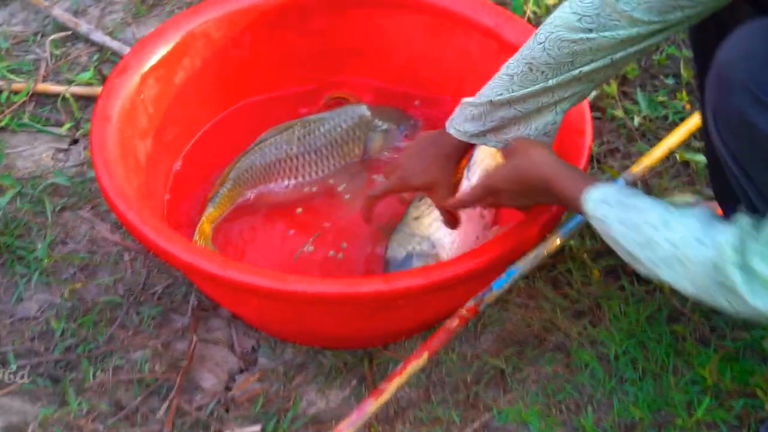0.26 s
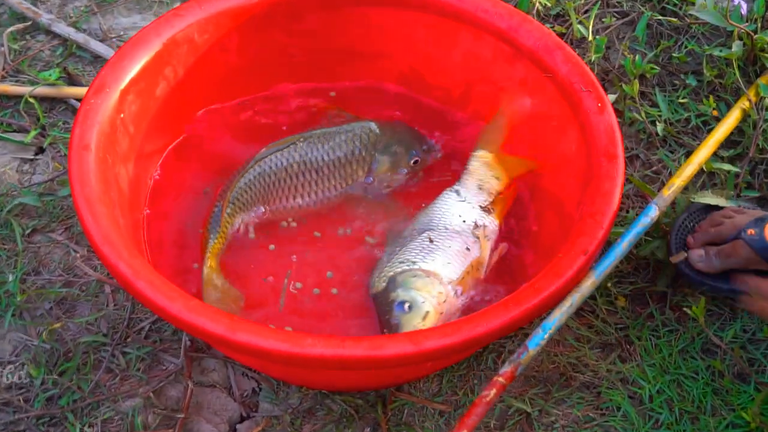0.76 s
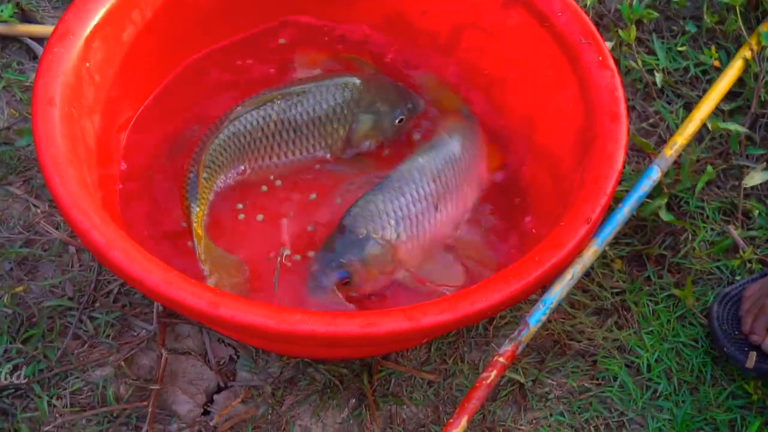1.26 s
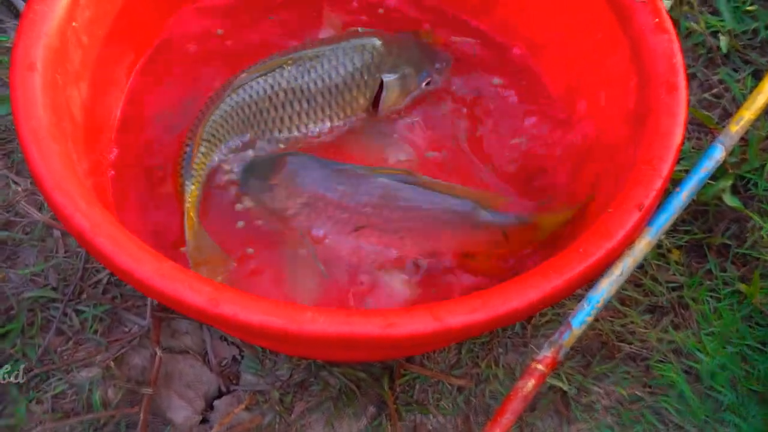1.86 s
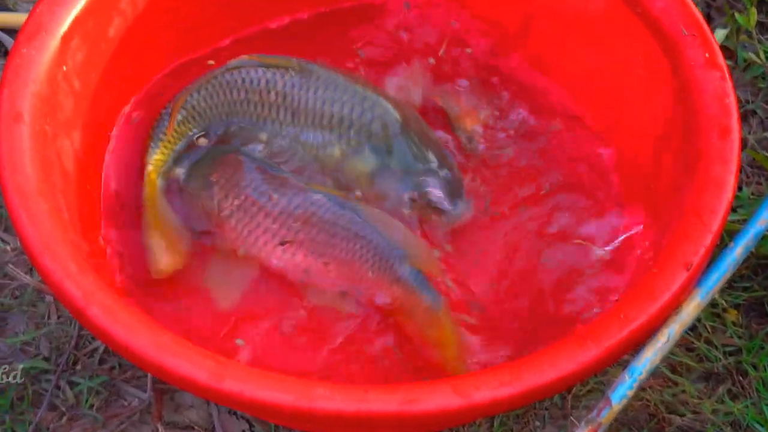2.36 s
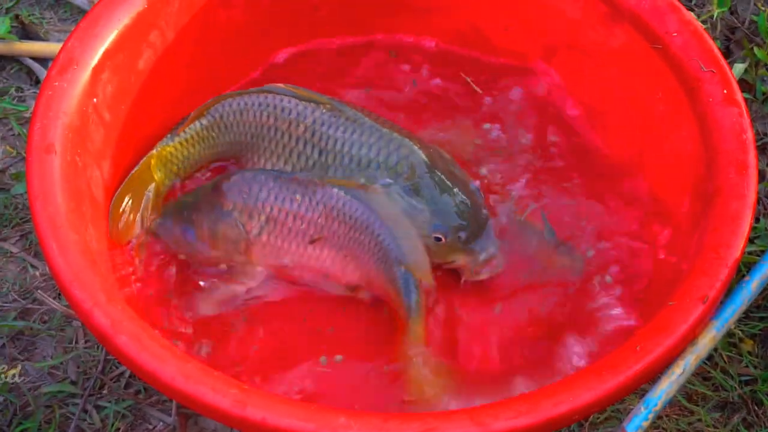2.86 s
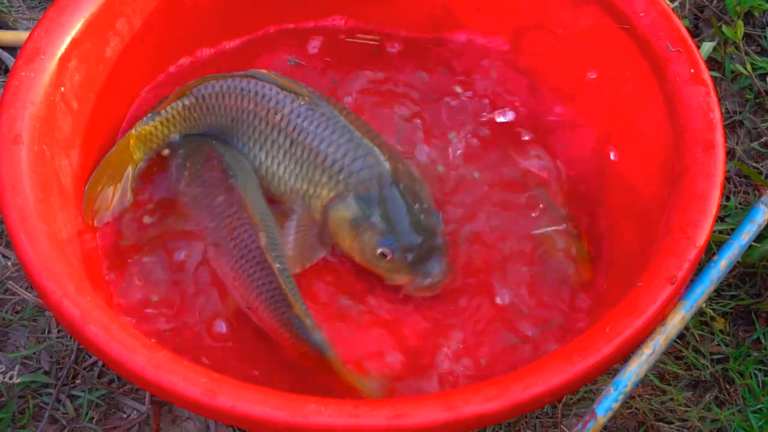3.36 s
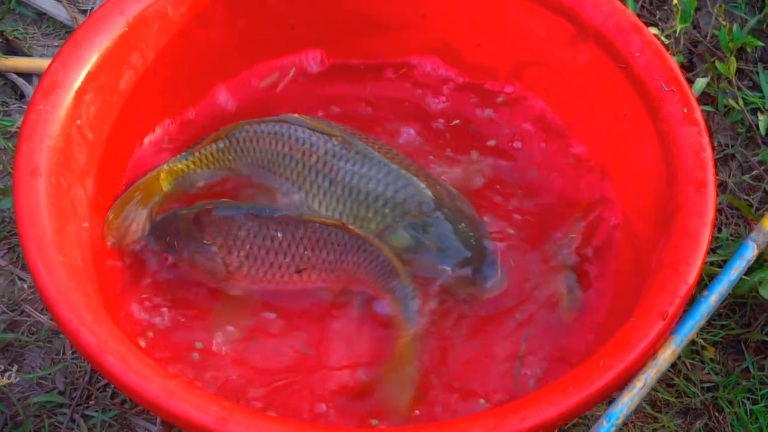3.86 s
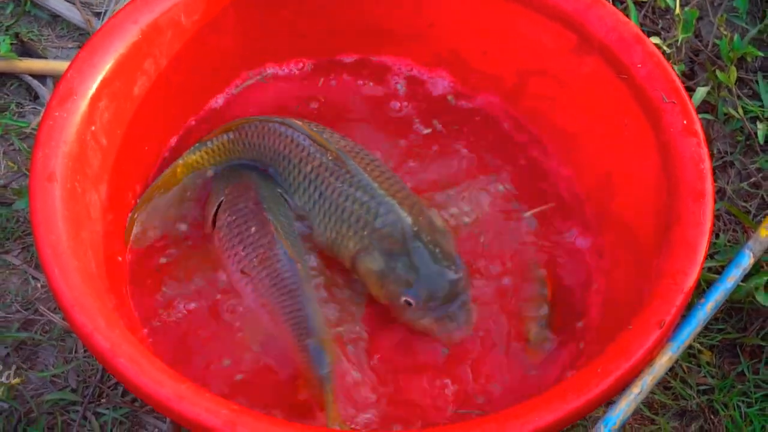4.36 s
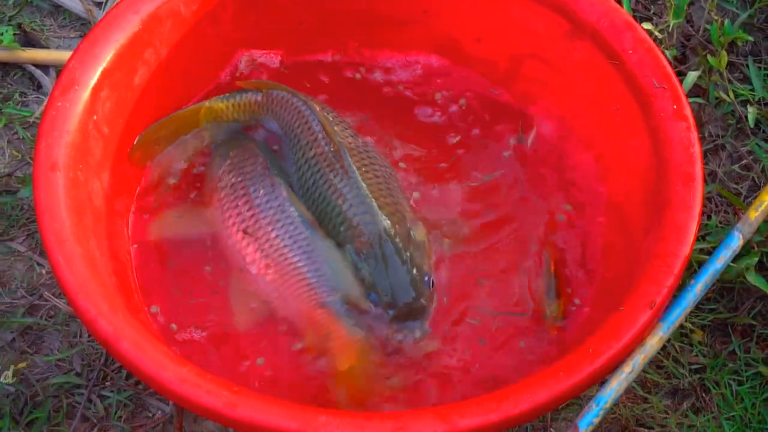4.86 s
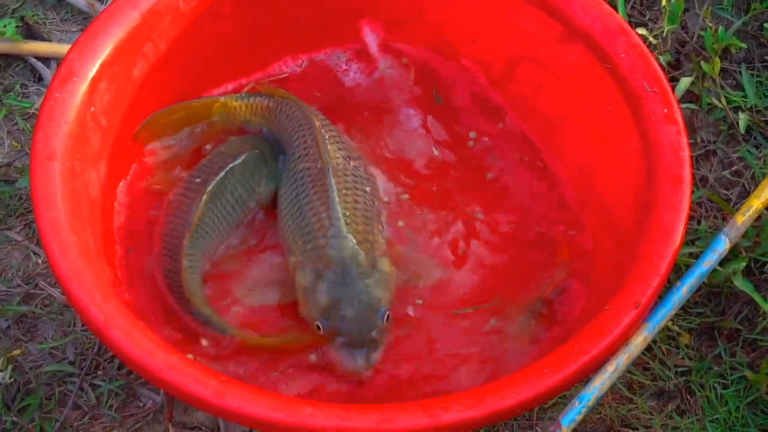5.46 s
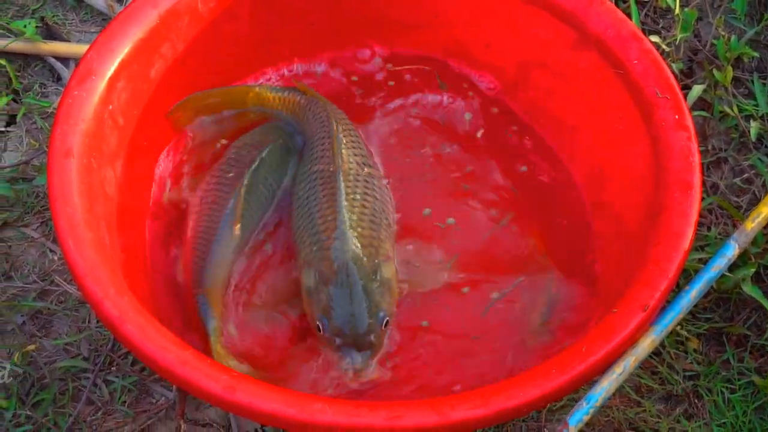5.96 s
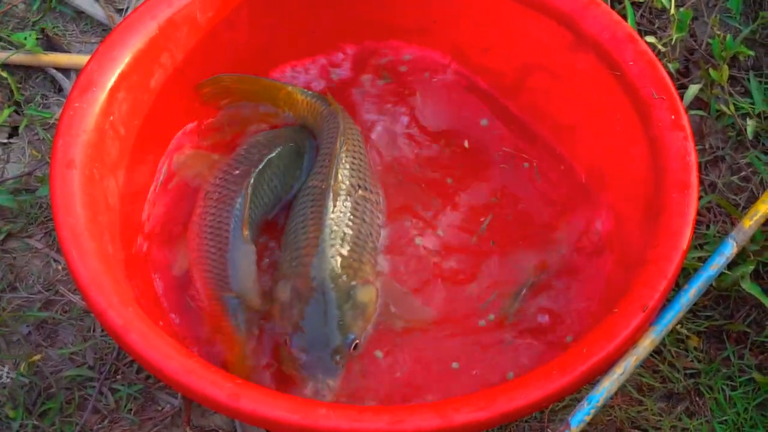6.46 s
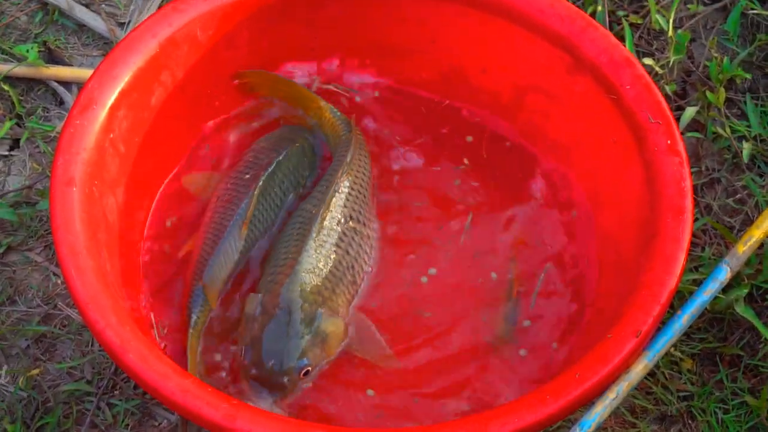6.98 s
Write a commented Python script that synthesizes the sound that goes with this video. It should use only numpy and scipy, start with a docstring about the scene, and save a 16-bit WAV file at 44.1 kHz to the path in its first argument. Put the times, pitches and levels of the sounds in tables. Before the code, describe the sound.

Close stereo sound of fish in a water-filled plastic basin outdoors. Soft swishing leads to a sharp volley of wet slaps and dull bumps on the tub, a short lull, then a second bout full of rising bubble plops and bright droplet ticks. Later the water only stirs now and then, and a bird's repeated chirps echo lightly from trees. Soft hiss trails the sounds, and a small splash ends it.

```python
"""Carp thrashing in a tub

Two carp thrash in shallow water in a plastic tub, outdoors and close by: noise swells into swish and froth.
Tails slap as short volleys of pops, trapped bubbles ring as rising tones, drops tick as brief noise.
Narrow grainy bands of noise swell, glide and fade; bodies thud on the tub's modes; a low rumble lies far off.
Towards the end birds whistle in gliding harmonics, smeared by echoes from the trees: a far whistle,
a faint rise, a sharp chip, two falling slurs, then a run of chirps. Hiss trails the sounds."""
import sys
import numpy as np
from scipy import signal
from scipy.fft import rfft, irfft, next_fast_len
from scipy.io import wavfile
from scipy.ndimage import uniform_filter1d, map_coordinates

SR = 44100
rng = np.random.default_rng(int(sys.argv[2]) if len(sys.argv) > 2 else 0)


def file_out(sig):
    """Save sig as 16-bit WAV at sys.argv[1]."""
    # one column per channel
    cols = np.atleast_2d(sig).T
    # limit, then scale
    lim = np.clip(cols, -1, 1)
    pcm = np.round(lim * 32767).astype(np.int16)
    wavfile.write(sys.argv[1], SR, pcm)


N = 318402
TIME = np.arange(N) / SR


def from_db(db):
    """Turn decibels into an amplitude factor."""
    return 10 ** (np.asarray(db) / 20)


def rms_one(x):
    """Scale a sound to an rms of 1."""
    return x / np.sqrt(np.mean(x ** 2) + 1e-20)


def at_hz(points, hz):
    """Read a spectrum in dB on a log-frequency axis."""
    point_hz, db = np.transpose(points)
    return np.interp(np.log(hz), np.log(point_hz), db)


def band(x, low_hz, high_hz):
    """Causal band-pass."""
    edges_hz = [low_hz, min(high_hz, .45 * SR)]
    sos = signal.butter(2, edges_hz, "band", fs=SR, output="sos")
    return signal.sosfilt(sos, x + 1e-18)


def add(out, start_s, sound):
    """Mix a sound in at its start time."""
    at = max(0, round(start_s * SR))
    out[..., at:at + sound.shape[-1]] += sound[..., :max(0, N - at)]


def panned(sound, pan_db):
    """Place a sound between the ears; positive is left."""
    return sound * from_db(np.outer([.5, -.5], pan_db))


def drift(rate_hz):
    """Smooth random wander through normal knots, rate_hz of them a second."""
    knots = rng.standard_normal(2000)
    wander = map_coordinates(knots, [TIME[::20] * rate_hz], order=2, mode="wrap")
    return wander.repeat(20)[:N]


def ring(clicks, hz, cycles):
    """Resonance that dies by 60 dB in so many cycles."""
    r = from_db(-60 * hz / (cycles * SR))
    return signal.lfilter([1, 0, -1], [1, -2 * r * np.cos(2 * np.pi * hz / SR), r * r], clicks + 1e-18)


def noise(spectrum, low_hz, high_hz, side_db):
    """Smooth stereo noise of a given colour, scaled to rms 1."""
    size = next_fast_len(N)
    colour = from_db(at_hz(spectrum, np.fft.rfftfreq(size, 1 / SR) + 1))
    mid, side = irfft(rfft(rng.standard_normal((2, size))) * colour, size)[:, :N]
    stereo = mid + from_db(side_db) * side * [[1], [-1]]
    return rms_one(band(stereo, low_hz, high_hz))


def echoes(x, delay_s, t60_s, low_hz, high_hz):
    """Scattered reflections that build up and die away, different at each ear; about unit gain in band."""
    t = TIME[:SR * 3 // 4]
    paths = band(rng.standard_normal((2, len(t))), low_hz, high_hz)
    paths = paths * np.tanh(t / delay_s) ** 2 * from_db(-60 * t / t60_s)
    paths = rms_one(paths) * np.sqrt((high_hz - low_hz) / (SR / 2) / len(t))
    return signal.fftconvolve(x, paths, axes=1)[:, :N]


def swarm(low_hz, high_hz, per_s, spread_db, cycles, scatter_db, count=11):
    """Bubbles of many sizes pop at random places; a resonance applied twice rounds their attack."""
    out, edges = np.zeros((2, N)), np.geomspace(low_hz, high_hz, count + 1)
    for lower, upper in zip(edges, edges[1:]):
        hz = np.sqrt(lower * upper)
        when, size, sign, place = rng.random((24000, 4))[:int(per_s * N / SR)].T
        # many small pops, a few large ones
        height = np.sign(sign - .5) * from_db(spread_db * np.minimum(-np.log(size + 1e-9), 3))
        clicks = np.zeros((2, N))
        clicks[:, (when * N).astype(int)] = panned(height, scatter_db * (2 * place - 1))
        pops = rms_one(ring(ring(clicks, hz, cycles), hz, cycles))
        out += np.sqrt(upper - lower) * from_db(at_hz(WATER, hz)) * pops
    return rms_one(out)


SLAP_FIZZ_DB, FIZZ_LOSS_PER_SLOSH = 0, 8.2  # fizz over bubbling; dB of it lost when slosh equals bubbling


def slap_levels(level_db, depth_db):
    """Slosh, bubbling and fizz of a slap in dB: the deeper it goes, the less spray it throws."""
    fizz_db = SLAP_FIZZ_DB - FIZZ_LOSS_PER_SLOSH * from_db(depth_db)
    return level_db + np.array([depth_db, 0, fizz_db])


# restlessness of the water between strokes: start_s, level_db (of its bubbling)
UNREST = [(0, -54.5), (.4, -56), (.55, -53), (.68, -53.5), (.95, -53.5), (1.1, -45.5), (1.55, -59),
          (1.85, -49.5), (2.27, -53), (2.45, -83.5), (2.8, -67), (3.05, -75), (3.55, -104), (4.0, -70),
          (4.4, -77), (4.9, -69.5), (5.3, -71), (6.3, -80), (7.1, -64)]
UNREST_SLOSH_DB, UNREST_FIZZ_DB = -6.5, -4  # against its bubbling
# a body or tail sweeps through the water:
# start_s, length_s, bubbling_db, slosh_over_bubbling_db, fizz_over_bubbling_db
SWEEPS = [(0.134, 0.029, -52.5, -7, 7.5), (0.19, 0.12, -48.5, 0.5, -3.5), (0.318, 0.048, -45, -7.5, -4),
          (0.437, 0.074, -55.5, -16, 10), (0.733, 0.09, -46, -6, -3), (1.3, 0.045, -38.5, -13, -9),
          (1.967, 0.048, -57.5, 13.5, -13), (2.084, 0.045, -63, 14, -10), (2.308, 0.024, -56, 11.5, 9),
          (2.586, 0.02, -46.5, -9, -9), (2.924, 0.04, -54.5, 14, 9.5), (3.006, 0.14, -47.5, -20, -6.5),
          (3.149, 0.1, -41.5, 0.5, 2.5), (3.255, 0.12, -44, -8, -9), (3.422, 0.14, -49.5, -15, -4.5),
          (3.6, 0.11, -56, -39, -1), (3.667, 0.09, -49, -38, 4.5), (3.795, 0.034, -53, -3, 2),
          (4.02, 0.034, -43.5, -12.5, -3), (4.068, 0.056, -44, -2.5, 2), (4.127, 0.11, -44, -15, -6),
          (4.332, 0.15, -49.5, -19, -5.5), (4.629, 0.057, -57.5, -16, 11), (4.736, 0.021, -51, -21, -12),
          (5, 0.1, -54.5, 0, 1.5), (5.335, 0.03, -73, -31, 11), (5.398, 0.069, -74, -47, 20.5),
          (5.535, 0.12, -60, -32, 0), (5.739, 0.01, -59, -10, 11), (5.824, 0.028, -47, -6.5, -7),
          (5.962, 0.088, -72, -15, 17), (6.193, 0.065, -44.5, -14, -6), (6.264, 0.053, -46.5, 2.5, -7),
          (6.316, 0.099, -47, -4.5, -6.5), (6.516, 0.13, -47.5, -43, -22), (6.739, 0.036, -52, -11, -16),
          (7.074, 0.022, -49, -0.5, -16)]
SWEEP_ATTACK_S, SETTLE_DB_PER_S = 0.027, 190
WAKE_DB = -10  # the water that a slap leaves churning, against the slap


def stirring():
    """Gains of slosh, bubbling and fizz: each stroke builds, holds and settles, on top of the general unrest."""
    t = TIME[::40]
    unrest_db = np.interp(t, *np.transpose(UNREST))
    power = from_db(np.add.outer([UNREST_SLOSH_DB, 0, UNREST_FIZZ_DB], unrest_db)) ** 2
    strokes = []
    for start_s, length_s, bubbling_db, slosh_db, fizz_db in SWEEPS:
        strokes.append((start_s, length_s, bubbling_db + np.array([slosh_db, 0, fizz_db])))
    for start_s, length_s, level_db, depth_db in SLAPS:
        strokes.append((start_s, length_s, slap_levels(level_db + WAKE_DB, depth_db)))
    for start_s, length_s, levels_db in strokes:
        attack = np.clip((t - start_s) / SWEEP_ATTACK_S, 0, 1)
        settle = from_db(-SETTLE_DB_PER_S * np.maximum(t - start_s - length_s, 0))
        power += np.outer(from_db(levels_db), attack * settle) ** 2
    return [np.interp(TIME, t, np.sqrt(p)) for p in power]


# how much the water froths: start_s, popping_over_swish_db (before random surges)
FROTH = [(0, -2.5), (1.9, 1), (2.8, 3), (3.35, 13.5), (4.3, 17.5), (4.8, 5.5), (6.3, 3), (7.0, -21),
         (7.2, 12)]
# colour of the churned water in the tub: frequency_hz, relative density (dB per Hz)
WATER = [(150, -35.5), (330, -13.5), (520, -16), (750, -6), (1100, -2), (1750, -3.5), (2250, 3),
         (3200, 0.5), (4800, -3.5), (7500, -2.5), (11000, -5), (15500, -10.5)]
# edges of the slosh, bubbling and fizz registers: frequency_hz
REGISTERS = [480, 1500, 4700, 16500]


def wash(slosh=(90, 3.6, 15), bubbling=(170, 5.0, 25), fizz=(150, 5.0, 15),
         surge_db=11.0, scatter_db=7, side_db=-4, level_db=-3.5):
    """Stirred water: a smooth swish that breaks into froth, in three registers."""
    froth = from_db(np.interp(TIME, *np.transpose(FROTH)) + surge_db * drift(70))
    out = np.zeros((2, N))
    registers = zip(REGISTERS, REGISTERS[1:], stirring(), (slosh, bubbling, fizz))
    # each register has its pops per second, size spread in dB and cycles of ring
    for low_hz, high_hz, gain, (per_s, spread_db, cycles) in registers:
        swish = noise(WATER, low_hz, high_hz, side_db)
        popping = froth * swarm(low_hz, high_hz, per_s, spread_db, cycles, scatter_db)
        water = (swish + popping) / np.hypot(1, froth)  # froth changes texture, not power
        out += water * gain * from_db(level_db)
    return out


# narrow grainy bands of noise, some trailing a pop: start_s, length_s, level_db, first_pitch_hz, last_pitch_hz
NARROW_BANDS = [(0, 0.23, -55.5, 1704, 1360), (0.39, 0.15, -58, 1020, 1005), (0.505, 0.17, -62, 2740, 2530),
                (0.717, 0.12, -52, 946, 1150), (2.923, 0.052, -57.5, 1120, 968),
                (3.023, 0.13, -51, 1100, 1287), (4.169, 0.12, -44, 2170, 2374),
                (4.271, 0.13, -48.5, 2630, 2310), (4.399, 0.076, -49.5, 2260, 1700),
                (6.274, 0.12, -58.5, 1042, 820)]


def narrow_bands(width_hz=480, grain_db=3.5):
    """Narrow grainy bands of noise that swell, glide and fade: slow noise multiplies a gliding sine."""
    out = np.zeros(N)
    slow_noise = band(rng.standard_normal(N), 10, width_hz / 2)
    slow_noise = rms_one(slow_noise * from_db(grain_db * drift(120)))
    for start_s, length_s, level_db, first_hz, last_hz in NARROW_BANDS:
        progress = np.linspace(0, 1, int(length_s * SR))
        pitch_hz = first_hz + (last_hz - first_hz) * progress
        tone = np.sin(2 * np.pi * np.cumsum(pitch_hz) / SR)
        swell = np.sqrt(np.abs(np.sin(np.pi * progress)))
        grain = np.roll(slow_noise, -round(start_s * SR))[:len(progress)]
        add(out, start_s, from_db(level_db) * rms_one(swell * tone * grain))
    return out


# distant outdoor rumble: frequency_hz, relative density (dB per Hz)
RUMBLE = [(25, -32.5), (55, -5), (120, 2), (155, -0.5), (200, -15.5), (350, -13.5), (700, -22), (2000, -47),
          (16000, -28.5)]


def rumble(level_db=-73):
    """Far, mostly low noise, nearly the same at both ears."""
    return from_db(level_db) * noise(RUMBLE, 25, 16000, side_db=-21)


# the larger air pockets: start_s, level_db (of the swell, before the layer level), pitch_hz (about which it glides)
BUBBLES = [(.213, -36, 1080), (0.24, -36.5, 1160), (0.5058, -24.5, 2515), (.582, -39.5, 996),
           (0.846, -44, 1050), (0.907, -43.5, 1020), (1.1947, -27, 2030), (1.267, -28, 1800),
           (1.323, -24, 2190), (1.392, -38.5, 988), (1.9173, -25.5, 1190), (2.018, -37, 1260),
           (2.036, -33.5, 730), (2.134, -34, 700), (2.149, -39, 814), (2.1796, -31.5, 4550),
           (2.276, -43.5, 935), (2.344, -32.5, 2300), (2.3709, -32.5, 4550), (2.473, -37.5, 1795),
           (2.5322, -34, 2980), (2.551, -28.5, 4150), (2.613, -38, 2670), (2.8137, -32.5, 2270),
           (2.847, -38, 2070), (2.8597, -37, 2370), (2.898, -38.5, 2050), (2.958, -27.5, 2610),
           (2.9658, -27.5, 1040), (3.046, -26.5, 2510), (3.0816, -31, 2590), (3.11, -26.5, 1110),
           (3.1325, -28, 1540), (3.173, -25, 980), (3.2039, -17.5, 2900), (3.22, -19, 2940),
           (3.283, -33, 1340), (3.294, -38, 1105), (3.376, -35, 3020), (3.2392, -27.5, 1500),
           (3.419, -32, 1470), (3.454, -33, 3880), (3.468, -32, 4120), (3.4958, -30, 2060),
           (3.6, -38.5, 1650), (3.63, -17.5, 3270), (3.715, -24.5, 970), (3.7702, -30, 1790),
           (3.846, -30, 4160), (3.9294, -32.5, 3450), (4.0624, -28.5, 2430), (4.086, -30, 1560),
           (4.095, -31.5, 1100), (4.156, -7, 2210), (4.1695, -24.5, 3300), (4.1205, -23, 2800),
           (4.1899, -32, 2090), (4.245, -30, 2560), (4.275, -24.5, 2660), (4.3248, -36.5, 2480),
           (4.3583, -20, 3780), (4.4046, -26, 2500), (4.431, -34, 2850), (4.4473, -32, 3600),
           (4.4764, -37.5, 1610), (4.486, -32, 1730), (4.542, -35, 1730), (4.5497, -29, 3720),
           (4.607, -32.5, 2200), (4.672, -43, 3800), (4.6826, -38, 2540), (5.8426, -28.5, 1670),
           (5.8643, -32.5, 1540), (6.0262, -33, 1240), (6.243, -28, 721), (6.248, -34, 1710),
           (6.253, -29, 852), (6.286, -37.5, 1190), (7.189, -25, 2150), (7.197, -25.5, 1314),
           (7.2125, -14.5, 2190)]
SWELL_CYCLES = 3.54  # the swell peaks after so many cycles, so large pockets ring longer


def bubbles(glide=0.011, swell=2.25, linger_db=-21, linger=13.0, tear_db=-13, tear_cycles=9,
            tear_width=1.286, scatter_db=1.0, layer_db=-.5):
    """An air pocket tears off with a short splutter, swells into a ring and climbs in pitch as it nears the surface."""
    out, t = np.zeros((2, N)), TIME[:3000]
    for start_s, level_db, hz in BUBBLES:
        age = t * hz / SWELL_CYCLES
        shape = (age * np.exp(1 - age)) ** swell
        shape += from_db(linger_db) * np.tanh(age) * np.exp(-age / linger)
        pitch_hz = hz * (1 + glide * rng.uniform(0.62, 1.8) * (np.minimum(age, 10) - 1))
        tone = shape * np.sin(2 * np.pi * np.cumsum(pitch_hz) / SR)
        splutter = rms_one(band(rng.standard_normal(len(t)), hz / tear_width, hz * tear_width))
        tone += from_db(tear_db) * splutter * np.exp(-t * hz / tear_cycles)
        pan_db = scatter_db * rng.uniform(-0.69, 1)
        add(out, start_s, panned(from_db(level_db + layer_db) * tone, pan_db))
    return out


# tail and fin slaps; deep ones slosh, shallow ones only crack:
# start_s, length_s, level_db, depth_db (slosh over bubbling)
SLAPS = [(0.24, 0.0067, -40, 3.5), (0.9745, 0.0093, -30.5, -54), (0.99, 0.0034, -35, -45),
         (1, 0.0012, -27, -18), (1.049, 0.013, -33.5, 0.5), (1.226, 0.0066, -33.5, -8.5),
         (1.238, 0.0036, -36.5, -1), (1.279, 0.0096, -38.5, -3.5), (1.331, 0.0044, -29, -13.5),
         (1.359, 0.0096, -31, -1.5), (1.438, 0.003, -33, -12), (1.456, 0.0087, -35.5, -1),
         (1.57, 0.012, -35.5, -7.5), (1.677, 0.006, -33, -4.5), (1.766, 0.011, -33.5, -7.5),
         (1.805, 0.0053, -38, -31), (1.827, 0.017, -35.5, -6), (1.909, 0.0058, -38, -7),
         (1.918, 0.011, -30, -6), (1.975, 0.0022, -34, -21), (1.986, 0.011, -37, -2),
         (2.037, 0.021, -46.5, 9.5), (2.062, 0.013, -36, -3), (2.143, 0.0061, -38.5, -3),
         (2.846, 0.012, -47.5, -65), (2.925, 0.0017, -35, -7.5), (2.96, 0.0029, -36, -20),
         (3.168, 0.019, -32, -1), (3.202, 0.006, -25, -11), (3.211, .012, -34, 6.5),
         (3.239, 0.0059, -37, -9), (3.416, 0.00033, -29, -35), (3.715, 0.0063, -30, -4),
         (4.117, 0.0082, -35.5, -31), (4.139, 0.0019, -34, -27), (4.171, 0.0044, -33.5, -34.5),
         (4.277, 0.0055, -40.5, -33), (4.543, 0.014, -44, -44), (6.025, 0.0076, -39, -21),
         (6.83, 0.0042, -54, 7.5), (7.087, 0.0031, -61, 19.5), (7.178, 0.039, -35.5, -15.5),
         (7.207, 0.018, -36.5, -6)]


def slaps(fall=1.6, rise_s=0.00023, crackle_db=2.0, sheet_db=-6, lead_in_db=-14, lead_in_s=0.0016):
    """A slap starts with a very brief, faint ramp of noise, then a sheet of water tears into collapsing pockets."""
    out, t = np.zeros((2, N)), TIME[:4096]
    before = TIME[512:0:-1]  # time left until the slap
    lead_in = from_db(lead_in_db) * np.exp(-before / lead_in_s)
    for register, (low_hz, high_hz) in enumerate(zip(REGISTERS, REGISTERS[1:])):
        pockets = swarm(low_hz, high_hz, per_s=390, spread_db=3.5, cycles=5.5, scatter_db=10.0, count=8)
        sheet = from_db(sheet_db) * noise(WATER, low_hz, high_hz, side_db=-5)
        churn = (pockets + sheet) * from_db(crackle_db * drift(700))
        for start_s, length_s, level_db, depth_db in SLAPS:
            burst = (1 - np.exp(-t / rise_s)) * np.exp(-(t / max(length_s, .002)) ** fall)
            shape = np.r_[lead_in, burst]
            places = round(start_s * SR) + np.arange(len(shape))
            volley = rms_one(shape * churn.take(places, axis=1, mode="wrap"))
            volley *= np.sqrt(length_s * SR / len(shape))  # longer slaps carry more energy
            gain = from_db(slap_levels(level_db, depth_db)[register])
            add(out, start_s - before[0], volley * gain)
    return out


# drops landing and films bursting: start_s, level_db (peak before the layer level), brightness_hz
DROPS = [(0.2661, -22, 4500), (0.4645, -28.5, 9500), (0.501, -18.5, 4380), (.977, -10.5, 6350),
         (1.104, -15.5, 7040), (1.1068, -19, 7400), (1.281, -19, 2390), (1.3305, -12, 2780),
         (1.387, -30, 6000), (1.9065, -24, 5300), (2.045, -24, 4760), (2.225, -16.5, 8900),
         (2.269, -20.5, 5700), (2.284, -28, 4800), (2.3145, -21, 11660), (2.3995, -29.5, 5470),
         (2.846, -21.5, 9200), (2.948, -32, 2960), (3.2045, -22, 3300), (3.2155, -25, 2880),
         (3.249, -27, 2740), (3.403, -15, 7170), (3.5443, -27, 3050), (3.549, -23, 13300),
         (3.6301, -13.5, 7800), (3.695, -22.5, 9000), (3.7157, -13.5, 5800), (3.7275, -15.5, 5000),
         (3.762, -23.5, 4600), (3.85, -28, 4900), (3.9929, -26, 9700), (4.037, -40, 3270),
         (4.0567, -23, 7400), (4.08, -21.5, 5950), (4.1132, -18.5, 5550), (4.1296, -27, 2930),
         (4.176, -28, 7000), (4.229, -31, 3980), (4.252, -28, 9100), (4.282, -23, 3180),
         (4.3592, -41, 4560), (4.395, -18, 14700), (4.4762, -27, 3530), (4.6283, -22.5, 11400),
         (4.646, -16.5, 12000), (4.703, -20, 13600), (4.764, -30, 8600), (4.8775, -20.5, 14000),
         (5.0491, -26, 3100), (5.5722, -38, 4600), (5.831, -37, 4070), (5.6272, -27, 4920),
         (5.749, -22.5, 7220), (5.9637, -24, 9000), (6.056, -33.5, 4900), (6.1172, -27.5, 12300)]


def drops(spatter_db=-19, spatter_s=0.00053, width=1.216, scatter_db=0.5, layer_db=-1):
    """A hard tick of narrow noise with a brief spatter behind it."""
    out, t = np.zeros((2, N)), TIME[:1024]
    tick = np.exp(-(t / .0009) ** 2)
    shape = tick + from_db(spatter_db) * np.exp(-t / spatter_s)
    for start_s, level_db, hz in DROPS:
        drop = band(shape * rng.standard_normal(len(t)), hz / width, hz * width)
        drop = from_db(level_db + layer_db) * drop / np.abs(drop).max()
        add(out, start_s, panned(drop, rng.normal(0, scatter_db)))
    return out


# a fish bumps the tub: start_s, peak_db
BUMPS = [(1.046, -42.5), (1.36, -45.5), (1.457, -45), (1.83, -43), (1.939, -48.5), (2.05, -35),
         (2.138, -39), (3.281, -50.5), (6.826, -54)]
# modes of the loaded tub: frequency_hz, level_db (relative), t60_s
TUB = [(84, -9.5, 0.097), (144, -8.5, 0.15), (231, -10, 0.049), (358, -1.5, 0.0068)]


def bumps(push_s=0.027, rub_db=-1, rub_s=0.1):
    """A heavy body pushes the soft plastic, which answers with a dull thud and a low rub."""
    out, t = np.zeros(N), TIME[:8192]
    for start_s, peak_db in BUMPS:
        push = band(np.exp(-t / push_s) * rng.standard_normal(len(t)), 52, 2500)
        thud = sum(from_db(mode_db) * rms_one(ring(push, hz, hz * t60_s)) for hz, mode_db, t60_s in TUB)
        rub = np.exp(-t / rub_s) * band(rng.standard_normal(len(t)), 233, 1070)
        thud += from_db(rub_db) * rms_one(rub)
        add(out, start_s, from_db(peak_db) * thud / np.abs(thud).max())
    return out


def calls(shape, rows, under_db, over_db, waver=0.014):
    """Whistles whose second harmonic carries the pitch, with a weak first and third."""
    shape_s, shape_hz, shape_db = np.transpose(shape)
    out, wobble = np.zeros(N), drift(250)
    for start_s, level_db, ratio, stretch in rows:
        t = TIME[TIME < shape_s[-1] * stretch] / stretch
        wavering = 1 + waver * np.roll(wobble, -round(start_s * SR))[:len(t)]
        pitch_hz = ratio * np.interp(t, shape_s, shape_hz) * wavering
        phase = np.pi * np.cumsum(pitch_hz) / SR  # first harmonic, half the heard pitch
        tone = np.sin(2 * phase) + from_db(under_db) * np.sin(phase) + from_db(over_db) * np.sin(3 * phase)
        add(out, start_s, tone * from_db(level_db + np.interp(t, shape_s, shape_db)))
    return out


# bird call shapes, before each call's ratios: time_s (from the start), pitch_hz, level_db (relative)
WHISTLE = [(0, 1420, -10), (.05, 1395, 0), (.19, 1375, 0), (.25, 1340, -12)]
RISE = [(0, 3050, -8), (.06, 3450, 0), (.13, 3800, -5)]
CHIP = [(0, 2300, -14), (.002, 2550, 0), (.005, 3200, -1), (.009, 4700, -5), (.011, 5200, -20)]
SLUR = [(0, 3100, -26), (.04, 3350, -15), (.052, 3350, -10), (.06, 3130, -1), (.078, 2620, 1),
        (.094, 2200, 0), (.108, 2050, -8)]
CHIRP = [(0, 3700, -17), (.005, 4130, -7), (.011, 4180, -7), (.016, 3850, -20), (.022, 4050, -9),
         (.029, 4350, -4), (.035, 4120, -1), (.044, 3680, 1), (.049, 3200, -16)]
# bird calls: start_s, level_db (before the bird's gains and echoes), pitch_ratio, length_ratio
WHISTLES = [(4.529, -69, 0.99, 0.91)]
RISES = [(5.05, -52.5, 0.95, 0.69)]
CHIPS = [(5.346, -33.5, 1, 0.98)]
SLURS = [(5.492, -43.5, 1, 0.86), (5.901, -37.5, 1, 0.87)]
CHIRPS = [(6.176, -32.5, 0.93, 1.05), (6.351, -28.5, 0.95, 0.92), (6.529, -32, 0.93, 1.09),
          (6.71, -31.5, 0.94, 1.05), (6.888, -32, .93, 1.2), (7.078, -44, 0.9, 0.94),
          (7.128, -35.5, 0.93, 0.78)]


def bird(pan_db=-7.0, level_db=4.0, slur_db=2.5, direct_db=-6, leaves_db=-8, trees_db=-6,
         bounce_db=-3.0, bounce_s=0.038):
    """Birds off to the right, smeared by nearby leaves, thrown back once and scattered by farther trees."""
    clear_calls = [(RISE, RISES), (CHIP, CHIPS), (WHISTLE, WHISTLES)]
    clear = sum(calls(shape, rows, under_db=-50, over_db=-40, waver=.004) for shape, rows in clear_calls)
    slurs = calls(SLUR, SLURS, under_db=-24, over_db=-34, waver=.03)
    hoarse = from_db(slur_db) * echoes(slurs[None], delay_s=.002, t60_s=.12, low_hz=1000, high_hz=4500)
    chirps = calls(CHIRP, CHIRPS, under_db=-20, over_db=-23, waver=.034)
    voice = clear + hoarse + chirps
    voice = panned(voice * from_db(level_db + 2 * drift(270)), pan_db)
    near = from_db(leaves_db) * echoes(voice, delay_s=.004, t60_s=.13, low_hz=1000, high_hz=6000)
    far = from_db(trees_db) * echoes(voice, delay_s=.025, t60_s=.4, low_hz=1000, high_hz=4500)
    add(far, bounce_s, from_db(bounce_db) * near)
    return from_db(direct_db) * voice + near + far


# outdoor hiss while the noise suppressor is open: frequency_hz, relative density (dB per Hz)
HISS = [(300, -23.5), (900, -10), (2500, -5.5), (4500, -6.5), (9000, -9.5), (16000, -2)]


def let_through(dry, hiss_db=-49.0, opens_db=-55, slope=3.7, close_db_per_s=70, size=512):
    """The hiss that a noise suppressor passes: each band opens with a sound in it and closes slowly."""
    _, t, sound = signal.stft(dry.mean(0), SR, nperseg=size)
    band_db = 10 * np.log10(uniform_filter1d(np.abs(sound) ** 2, size=9, axis=0) + 1e-14)
    # a running maximum against a falling line: instant opening, steady closing
    closing_db = close_db_per_s * t
    wanted_db = np.minimum(slope * (band_db - opens_db), 0)
    gain_db = np.maximum.accumulate(wanted_db + closing_db, axis=1) - closing_db
    hiss = signal.stft(noise(HISS, 200, 16000, side_db=-7), SR, nperseg=size)[2]
    passed = signal.istft(hiss * from_db(gain_db + hiss_db), SR, nperseg=size)[1]
    out = np.zeros((2, N))
    add(out, size / 2 / SR, passed)  # half a window late
    return out


def scene(tub_db=-12, rim_db=-9, yard_db=-17):
    """The water, its quick reflections off the tub wall and the yard, the birds and the distance."""
    water = wash() + slaps() + bubbles() + drops() + narrow_bands()
    wall = from_db(tub_db) * echoes(water, delay_s=0.00086, t60_s=0.053, low_hz=496, high_hz=14600)
    rim = from_db(rim_db) * echoes(water, delay_s=0.00024, t60_s=0.026, low_hz=3340, high_hz=15400)
    yard = from_db(yard_db) * echoes(water, delay_s=0.0087, t60_s=0.17, low_hz=900, high_hz=8650)
    tub = panned(water + wall + rim + yard, -2.8)  # a little to the right
    return tub + bumps() + bird() + rumble()


CUTOFF_HZ = 16200


def record(dry):
    """Hiss trails each sound through the noise suppressor; the top is cut steeply."""
    heard = dry + let_through(dry)
    return signal.sosfilt(signal.ellip(10, .2, 80, CUTOFF_HZ, fs=SR, output="sos"), heard)


dry = scene()
out = record(dry)
file_out(out)
```